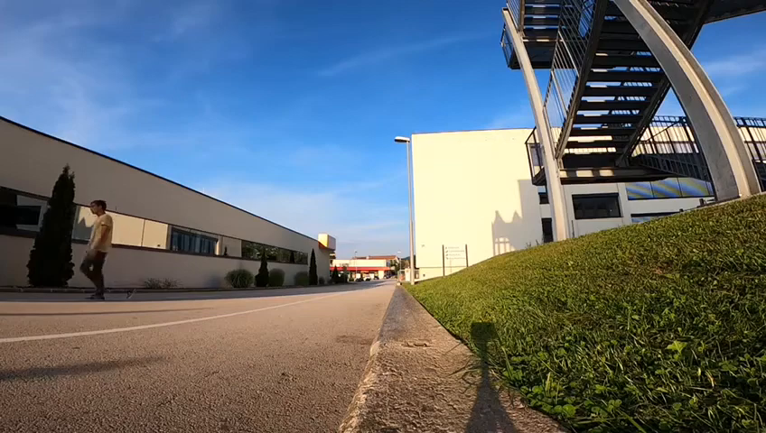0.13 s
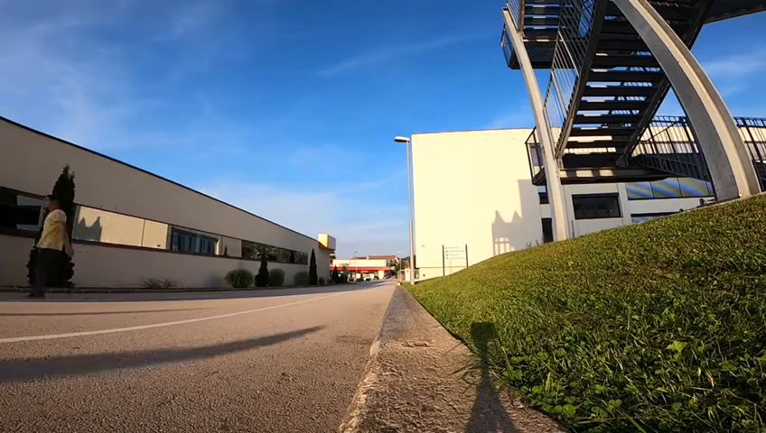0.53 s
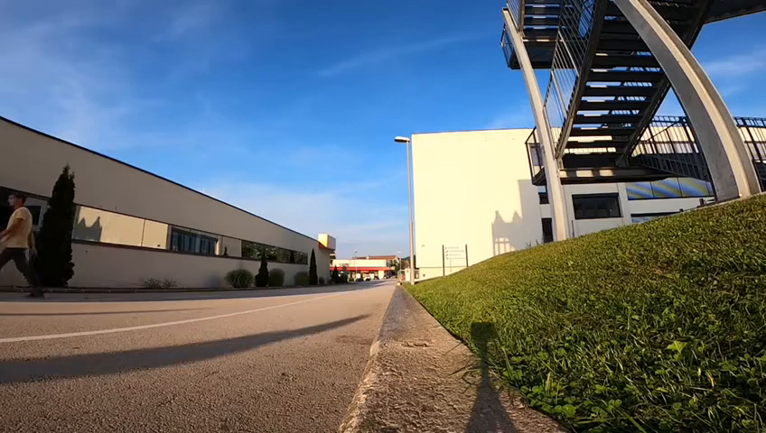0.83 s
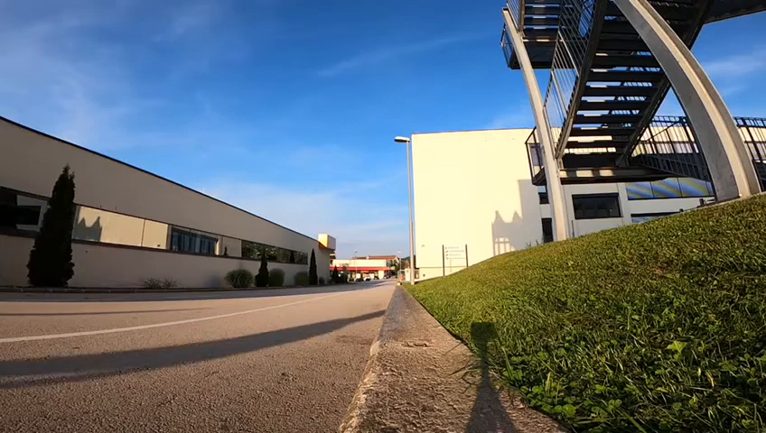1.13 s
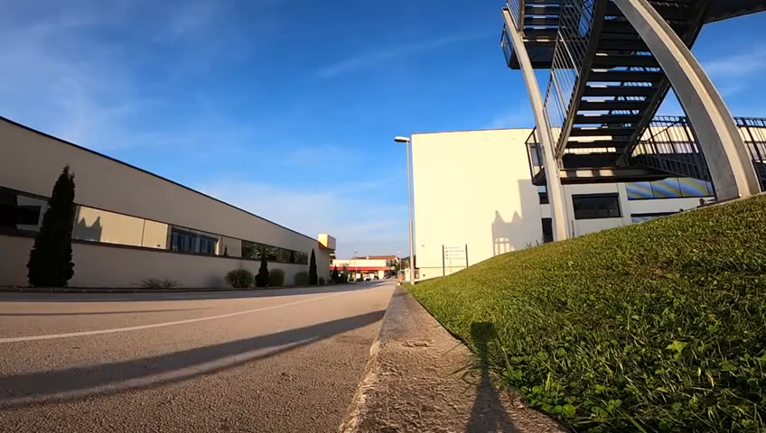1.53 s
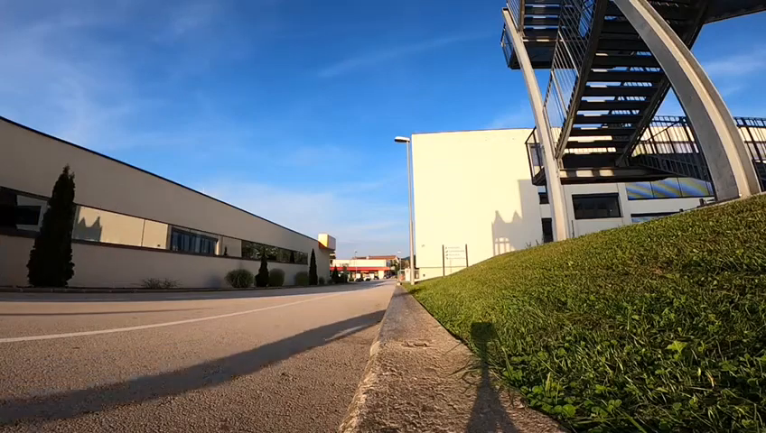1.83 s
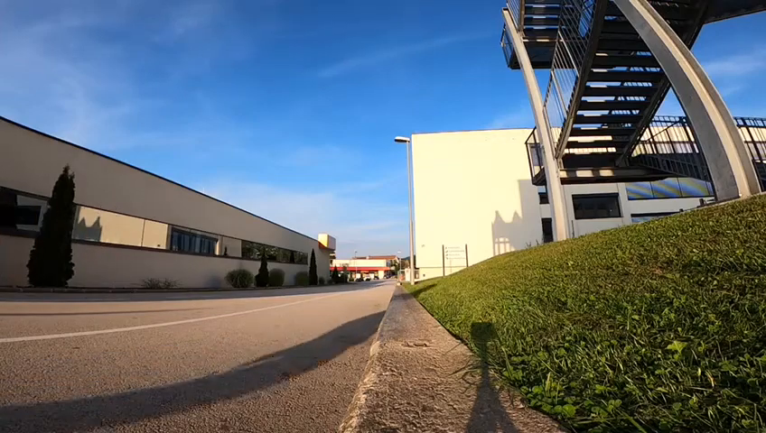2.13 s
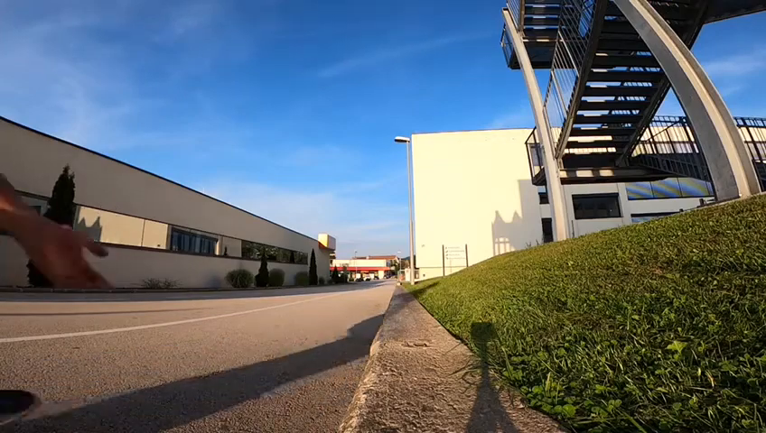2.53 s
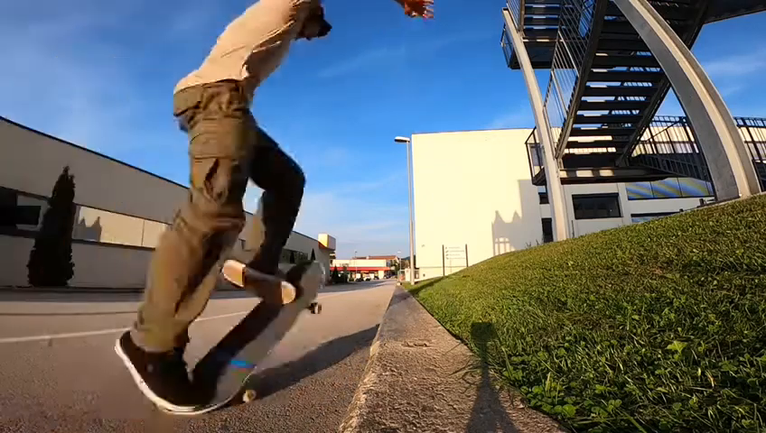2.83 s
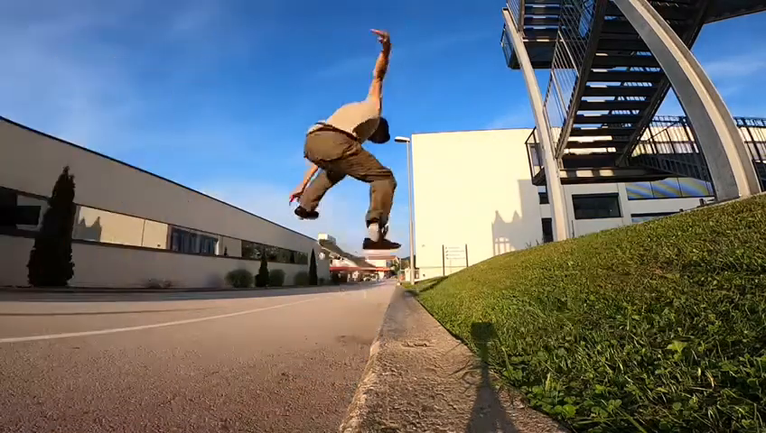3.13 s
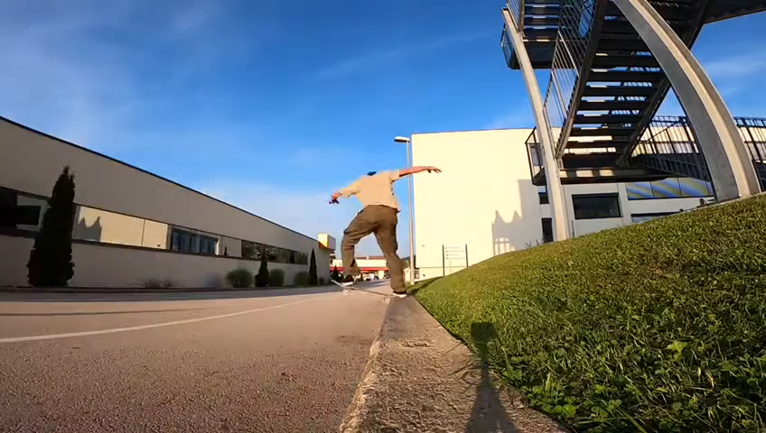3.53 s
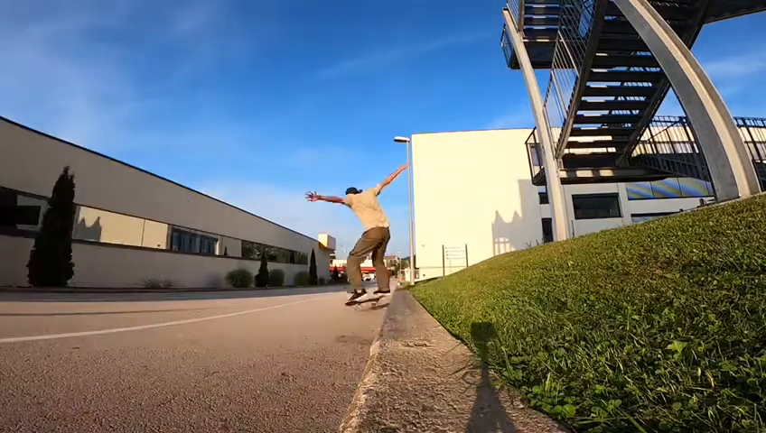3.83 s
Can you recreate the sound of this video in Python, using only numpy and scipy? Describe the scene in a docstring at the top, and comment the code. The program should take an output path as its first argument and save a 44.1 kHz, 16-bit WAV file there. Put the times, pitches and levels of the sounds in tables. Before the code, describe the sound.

Skateboard wheels rumble over coarse asphalt with small stone knocks, pass close to a low stereo microphone, then a pop, a short gap, clustered wooden clacks on a concrete ledge and a fading scrape, outdoors.

```python
"""Rough asphalt beside a concrete ledge, buildings around, a camera with two microphones on the ground.
A skateboard, made of dense random grains in coloured noise bands, rolls up from the left and passes close.
The tail pops, a shoe brushes up the grip tape, and the board clacks onto the ledge and scrapes along it:
the blows ring decaying modes, the rubs are filtered grains.
Noise-burst echoes return from the buildings over a sine-wave machine hum, noise air and light wind."""
import sys
import numpy as np
from scipy import signal
from scipy.fft import rfft, irfft
from scipy.io import wavfile
from scipy.ndimage import uniform_filter1d

SR = 44100
rng = np.random.default_rng(int(sys.argv[2]) if len(sys.argv) > 2 else 0)


def generate_wav(signal):
    """Clip the signal to [-1, 1] and save it as 16-bit WAV at the path in sys.argv[1]."""
    frames = np.transpose(np.atleast_2d(signal))
    scaled = np.clip(frames, -1, 1) * 32767
    pcm = np.round(scaled).astype(np.int16)
    wavfile.write(sys.argv[1], SR, pcm)


N = 176400  # samples, 4 s

# Machine hum in the distance. Each row: time in seconds, level in dB.
HUM_LEVEL = [(.12, -32), (.3, -24.5), (.72, -32), (.84, -43), (1.05, -30), (1.2, -43), (1.9, -31),
             (2.6, -33.5), (3.1, -48.5), (3.3, -37), (3.7, -43), (4, -41.5)]
# Pitch of the hum. Each row: time in seconds, frequency in Hz.
HUM_PITCH = [(0, 118.3), (.8, 119.5), (2, 117.3), (4, 111.8)]
HUM_WAVER_DB = 2
DRONE_HZ, DRONE_DB, DRONE_PEAK_S, DRONE_WIDTH_S = 60.1, -40.5, 1.4, 1
# Colour of the outdoor air. Each row: frequency in Hz, relative level in dB.
AIR_COLOUR = [(25, -1), (45, 20), (75, -4), (250, -20), (700, -9.5), (2000, -24), (5000, -20.5),
              (11000, -47)]
AIR_DB = -48.5
WIND_DB, WIND_TOP_HZ, GUST_DB = -70, 48.7, -6.5

# The rolling board. Each row: time in seconds, deck rumble in dB, wheel roar in dB, grit in dB.
ROLL_LEVELS = [(.12, -43, -41.5, -52), (.22, -30, -39.5, -42.5), (.42, -33.5, -44, -50.5),
               (.6, -32, -37.5, -44.5), (.8, -35.5, -38, -49), (1.1, -32, -33, -46), (1.42, -29, -31, -43),
               (1.75, -30, -33, -44.5), (2.12, -27, -32, -43), (2.2, -25.5, -28, -37),
               (2.34, -29, -33.5, -41), (2.48, -31, -28, -37.5), (2.7, -23, -33.5, -35),
               (2.82, -25.5, -26.5, -28), (2.92, -25.5, -27.5, -30.5), (2.955, -28, -32, -36.5),
               (3.0, -33, -26, -23), (3.04, -45.5, -54.5, -46.5)]
# Colour of the deck rumble. Each row: frequency in Hz, relative level per Hz in dB.
RUMBLE_COLOUR = [(25, -30), (55, -22), (80, -8.5), (105, 4.5), (140, 2), (220, 0.5), (310, 2), (400, -4),
                 (600, -7), (1500, -60)]
# Colour of the wheel roar. Each row: frequency in Hz, relative level per Hz in dB.
ROAR_COLOUR = [(200, -31), (380, -4.5), (480, 0.5), (580, -4), (670, 8), (770, -2), (1020, -3),
               (1250, -21.5), (2700, -50), (3350, -18.5), (4000, -48)]
# Colour of the grit under the wheels. Each row: frequency in Hz, relative level per Hz in dB.
GRIT_COLOUR = [(500, -4.5), (1300, 4.5), (1900, -0.5), (2900, -3.5), (3400, -3.5), (4000, -7.5),
               (5500, -10.5), (7200, -19), (10000, -24), (12000, -44.5)]
# Colour of the fine hiss heard up close. Each row: frequency in Hz, relative level per Hz in dB.
HISS_COLOUR = [(6500, -33), (10000, 20), (12500, -11), (16000, -78)]
GRAINS_PER_S, GRAIN_SPREAD_DB = 3500, 1.5
WHEEL_TURNS_HZ, WHEEL_THROB_DB, PATCHY_DB = 32.1, 1, 1.07
CLOSE_HISS_DB, CLOSE_S, CLOSE_WIDTH_S = -54, 2.87, 0.25
CHIPS_PER_S, CHIPS_DB = 100, -34  # coarse chips that crunch under the wheels up close

# Returns from the walls. Each row: delay in seconds, level in dB.
WALL_ECHOES = [(0.059, -20), (0.167, -25), (.225, -21), (0.272, -25)]
# Colour of what the buildings return. Each row: frequency in Hz, relative level in dB.
YARD_COLOUR = [(60, -28), (300, -27), (1000, -1), (2500, 0), (4300, 1.5), (8000, -2), (12000, -8)]
YARD_T60_S, YARD_TAIL_DB, ECHO_SMEAR_S = 1.2, -25, 0.022
YARD_WIDTH = 0.56  # gain of the echoes that differ between left and right

# Wheel bumping over a stone. Each row: start in seconds, level in dB before the modes' own levels.
STONES = [(.694, -32), (1.125, -25), (1.279, -28), (2.745, -20)]
# Modes a wheel rings with. Each row: frequency in Hz, level in dB, 60 dB decay time in seconds.
WHEEL_MODES = [(447, -14, 0.023), (668, 4, 0.035), (1006, -8, 0.025), (3500, -18, 0.017)]

# Scuffs of shoe, pebble and truck.
# Each row: peak time in seconds, level in dB, rise in seconds, fall in seconds, lowest frequency in Hz.
SCUFFS = [(1.859, -49, 0.0068, 0.025, 5860), (2.2, -43, 0.0049, 0.0093, 4000),
          (2.67, -34.5, 0.0018, 0.0036, 3000), (3.091, -34.5, 0.018, 0.0083, 5000),
          (3.557, -24, 0.002, 0.017, 500), (3.769, -38.5, 0.007, 0.045, 390)]
# Colour of the scuffs. Each row: frequency in Hz, relative level in dB.
SCUFF_COLOUR = [(300, -7), (1100, 18.5), (2000, 1), (4000, 3), (6000, -2), (8000, -12), (11000, -18.5)]

# Two deck booms as the board comes close.
# Each row: time in seconds, lower band in Hz, upper band in Hz, level of the lower band in dB.
BOOM = [(2.3, 129, 215, -31), (2.44, 142, 236, -23), (2.61, 211, 473, -23.5), (2.8, 183, 492, -21.5),
        (2.91, 278, 482, -22.5), (2.97, 260, 768, -32)]
# half-widths of the bands, and the upper band against the lower
BOOM_WIDTH_HZ, UPPER_WIDTH_HZ, UPPER_DB = 31.5, 68, -3.5

# Blows of the board. Each row: start in seconds, clack in dB, contact in seconds,
# upper limit of the clack in Hz, thump in dB, push in seconds.
BLOWS = [(2.972, -23, 0.00065, 950, -18.5, 0.00019), (2.984, -33.5, .002, 2420, -19, 0.00019),
         (2.994, -26, 0.00081, 1090, -15, 0.00032), (3.002, -18, 0.0052, 2800, -16.5, 0.00064),
         (3.334, -23, 0.0022, 1910, -28, 0.00072), (3.3364, -20.5, 0.0027, 2800, -20, 0.0017),
         (3.395, -13.5, 0.0035, 6300, -17.5, 0.00094), (3.414, -30, 0.00039, 5500, -16.5, 0.0005),
         (3.427, -18.5, 0.0041, 5300, -18.5, 0.00096), (3.461, -29, 0.00071, 6500, -26, 0.0014),
         (3.473, -28, .0005, 5960, -23, 0.0018)]
# Modes the board rings with. Each row: frequency in Hz, level in dB, 60 dB decay time in seconds.
BOARD_MODES = [(757, -4, 0.082), (1404, 7.5, 0.02), (1804, 9, 0.026), (2286, 4, 0.032), (2624, 3.5, 0.045),
               (2930, 9, 0.015), (3460, 9.5, 0.013), (4040, 13, .011), (4650, 5.5, 0.013),
               (5600, -2, 0.011)]
# Low bending modes of the deck. Each row: frequency in Hz, level in dB, 60 dB decay time in seconds.
DECK_MODES = [(55.5, -17, 0.2), (137.5, -3.5, 0.051), (216, -3.5, 0.076), (273, 2.5, 0.046),
              (399, -1.5, 0.026), (482, 3, 0.03), (600, -3.5, 0.024), (1000, 3, 0.018)]
# Colour of the bare contact. Each row: frequency in Hz, relative level in dB.
CRACK_COLOUR = [(200, -2.5), (600, -3), (1050, -8), (1500, 0.5), (2100, 4), (3300, 0.5), (4200, 3.5),
                (5200, -9.5), (6500, -4), (8000, -26), (11500, -29)]
CRACK_DB, RELEASE_S = -1, 0.0011  # bare contact against the ring; fading of the force after contact
WEIGHT_LAG = 1.48  # the rider's weight bends the deck this many contact lengths after the clack
FIRST_TOUCH = 0.44  # size of the first sharp contact against the chatter after it

# Sliding on the ledge. Each row: time in seconds, deck rumble in dB, scrape in dB.
SLIDE_LEVELS = [(3.1, -65, -79), (3.28, -85, -50), (3.35, -45, -30.5), (3.39, -32, -38.5), (3.44, -30, -27),
                (3.5, -30.5, -38), (3.545, -38.5, -38), (3.57, -31.5, -37), (3.68, -66, -42),
                (3.82, -60, -72), (4, -126, -69)]
# Colour of the scrape. Each row: frequency in Hz, relative level in dB.
SCRAPE_COLOUR = [(200, -11), (450, 4), (900, 3.5), (1350, 2.5), (2400, -2), (4000, -10), (6000, -13.5),
                 (8000, -37), (11000, -32)]
SHUDDER_DB = 1

# How far to the left the board is. Each row: time in seconds, share from 0 to 1.
BEARING = [(.2, 0.7), (1.8, 0.87), (2.55, 0.86), (2.75, 0.52), (2.92, 0.16), (3.1, 0.15), (3.4, 0.1),
           (4, 0.24)]
# Shading of the far microphone by the camera body. Each row: frequency in Hz, side over mid in dB.
BODY_SHADE = [(60, -16), (190, -23), (350, -10.5), (620, -3.5), (1100, -0.5), (3500, 1.5), (6500, -8),
              (10000, 3.5)]
# Ground scatter that differs between the microphones. Each row: frequency in Hz, level in dB.
GROUND_SCATTER = [(100, -42), (700, -11.5), (2000, -7), (4500, -7.5), (7000, 9), (11000, -4)]
LEFT_RIGHT = np.array([[1], [-1]])  # a side signal is opposite at the two microphones
OPEN_S, FADE_S, CEILING, TOP_HZ = 0.12, 0.045, .95, 11500


def undb(db):
    """Decibels to gain."""
    return 10 ** (np.asarray(db) / 20)


def unit(x):
    """Scale to rms 1."""
    return x / np.sqrt(np.mean(x ** 2))


def times():
    """Seconds at each sample."""
    return np.arange(N) / SR


def curve(table, axis=1):
    """One column of a table, joined by straight lines in time."""
    rows = np.array(table)
    return np.interp(times(), rows[:, 0], rows[:, axis])


def gains(points):
    """Gain at each frequency bin from (Hz, dB) points, joined on a log frequency scale."""
    hz, db = np.array(points).T
    bins_hz = np.arange(N // 2 + 1) * SR / N
    return undb(np.interp(np.log(bins_hz + 1), np.log(hz), db))


def convolve(x, response):
    """Play a sound through a response."""
    return signal.fftconvolve(x, response)[:len(x)]


def colour(x, points):
    """Causal minimum-phase filter with the given spectrum, built by folding its cepstrum."""
    cepstrum = irfft(np.log(gains(points)), N)[:N // 2]
    cepstrum[1:] *= 2
    response = irfft(np.exp(rfft(cepstrum, N)), N)[:N // 20]
    return convolve(x, response)


def cut(x, hz, kind, order=2):
    """Low-pass or high-pass."""
    sos = signal.butter(order, min(hz, SR / 2 - 1), kind, fs=SR, output="sos")
    return signal.sosfilt(sos, x)


def walk(rate):
    """Smooth random drift with a spread near 1, taking a new value `rate` times a second."""
    k = int(SR / rate)
    steps = np.repeat(rng.standard_normal(N // k + 1), k)
    smooth = uniform_filter1d(uniform_filter1d(steps, k), k)
    return unit(smooth)[:N]


def grains():
    """Dense tiny impacts on stone chips, a few harder than the rest."""
    hits = rng.random(N) < GRAINS_PER_S / SR
    signs = rng.choice([-1, 1], N)
    hardness = undb(GRAIN_SPREAD_DB * np.minimum(rng.exponential(size=N), 5))
    return hits * signs * hardness


def ring(modes, t, jitter=.012):
    """Decaying modes, a little different in pitch and sign at each point of contact."""
    total = 0
    for hz, db, t60 in modes:
        sign = rng.choice([-1, 1])
        pitch = hz * (1 + jitter * rng.standard_normal())
        total = total + sign * undb(db - 60 * t / t60) * np.sin(2 * np.pi * pitch * t)
    return total


def background():
    """A wavering machine hum, a lower drone that swells once, and nearly centred outdoor air."""
    def tone(hz):
        wavering = hz * (1 + 0.01 * walk(7.6))
        return np.sqrt(2) * np.sin(2 * np.pi * np.cumsum(wavering) / SR)
    hum = tone(curve(HUM_PITCH)) * undb(curve(HUM_LEVEL) + HUM_WAVER_DB * walk(12))
    swell = 1 / (1 + ((times() - DRONE_PEAK_S) / DRONE_WIDTH_S) ** 2)
    drone = tone(DRONE_HZ) * undb(DRONE_DB) * swell
    mid = unit(colour(rng.standard_normal(N), AIR_COLOUR))
    side = unit(colour(rng.standard_normal(N), AIR_COLOUR))
    return hum + drone + undb(AIR_DB) * (mid + 0.067 * side * LEFT_RIGHT)


def wind():
    """Light gusts buffet the microphones as very low noise, partly unlike left and right."""
    def buffet():
        low = cut(rng.standard_normal(N), WIND_TOP_HZ, "low", order=4)
        return unit(cut(low, 32, "high"))
    gusts = undb(WIND_DB + GUST_DB * walk(7.7))
    return gusts * (buffet() + buffet() * LEFT_RIGHT)


def rolling():
    """Chips shake deck and wheels, throbbing with each wheel turn; hiss and crunch rise up close."""
    turn = 2 * np.pi * np.cumsum(WHEEL_TURNS_HZ * (1 + 0.034 * walk(5.38))) / SR
    throb_db = WHEEL_THROB_DB * (np.sin(turn) + np.sin(2 * turn))
    load = undb(throb_db + PATCHY_DB * walk(22.0))

    def layer(points):
        return unit(colour(grains() * load, points))

    on_ground = times() < ROLL_LEVELS[-2][0]
    close = on_ground / (1 + ((times() - CLOSE_S) / CLOSE_WIDTH_S) ** 2)
    hiss = undb(CLOSE_HISS_DB) * layer(HISS_COLOUR)
    chips = cut(1. * (rng.random(N) < CHIPS_PER_S / SR), CHIPS_PER_S, "low")
    crunch = undb(CHIPS_DB) * unit(colour(grains() * chips, GRIT_COLOUR))
    rumble = layer(RUMBLE_COLOUR) * undb(curve(ROLL_LEVELS, axis=1))
    roar = layer(ROAR_COLOUR) * undb(curve(ROLL_LEVELS, axis=2))
    grit = layer(GRIT_COLOUR) * undb(curve(ROLL_LEVELS, axis=3))
    return close * (hiss + crunch) + rumble + roar + grit


def yard(x):
    """Buildings return smeared echoes and a thin tail, as enveloped bursts of noise."""
    t = times()

    def burst(envelope):
        return unit(rng.standard_normal(N) * envelope) / np.sqrt(N)  # total energy 1

    tail = undb(-60 * t / YARD_T60_S) * (1 - np.exp(-t / 0.019))
    response = undb(YARD_TAIL_DB) * burst(tail)
    for delay, db in WALL_ECHOES:
        smear = (t > delay) * np.exp(-abs(t - delay) / ECHO_SMEAR_S)
        response = response + undb(db) * burst(smear)
    return convolve(colour(x, YARD_COLOUR), response)


def stones():
    """Single stones knock the wheels into a short hollow ring of decaying modes."""
    out, t = np.zeros(2 * N), times()[:N // 20]
    for start, db in STONES:
        i = int(start * SR)
        out[i:i + len(t)] += undb(db) * ring(WHEEL_MODES, t)
    return out[:N]


def scuffs():
    """Short gritty rubs, high-passed grains that swell and die exponentially."""
    t, rub = times(), colour(grains(), SCUFF_COLOUR)
    out = np.zeros(N)
    for peak, db, rise, fall, lowest_hz in SCUFFS:
        swell = np.exp(-np.maximum((peak - t) / rise, (t - peak) / fall))
        out += unit(cut(rub, lowest_hz, "high")) * undb(db) * swell
    return out


def boom():
    """Two narrow bands of rumble whose pitches climb overall as the board comes close."""
    def band(hz, width_hz):
        # shift the band down to zero, low-pass it, shift it back
        spin = np.exp(2j * np.pi * np.cumsum(hz) / SR)
        return unit(np.real(cut(grains() / spin, width_hz, "low") * spin))
    near = (times() > BOOM[0][0]) & (times() < BOOM[-1][0])
    lower = band(curve(BOOM, axis=1), BOOM_WIDTH_HZ)
    upper = undb(UPPER_DB) * band(curve(BOOM, axis=2), UPPER_WIDTH_HZ)
    return near * undb(curve(BOOM, axis=3)) * (lower + upper)


def chatter(envelope, count=4):
    """A sharp first contact, then a short random force that excites all pitches nearly evenly."""
    force = rng.standard_normal(len(envelope)) * envelope
    for _ in range(count):
        flat = irfft(np.exp(1j * np.angle(rfft(force))), len(envelope))  # keep only the phases
        force = flat * np.sqrt(envelope)
    first = np.arange(len(envelope)) == 0
    return force / np.linalg.norm(force) + FIRST_TOUCH * first


def blows():
    """Each blow chatters for a few milliseconds into the board's modes, then bends the deck."""
    out, t = np.zeros(2 * N), times()[:N // 20]

    def sized(x, db):
        return unit(x) * undb(db) / np.sqrt(20)  # the level is that of the same energy in 10 ms

    for start, clack_db, contact, bright_hz, thump_db, push in BLOWS:
        touch = chatter(np.exp(-np.maximum(t - contact, 0) / RELEASE_S))
        crack = undb(CRACK_DB) * unit(colour(touch, CRACK_COLOUR))
        clack = unit(convolve(touch, ring(BOARD_MODES, t))) + crack
        late = np.maximum(t - WEIGHT_LAG * contact, 0)
        weight = late * np.exp(-2 * late / push)
        thump = convolve(weight, ring(DECK_MODES, t))
        i = int(start * SR)
        out[i:i + len(t)] += sized(cut(clack, bright_hz, "low", order=4), clack_db)
        out[i:i + len(t)] += sized(thump, thump_db)
    return out[:N]


def slide():
    """The board scrapes along the ledge, catching unevenly, over a grainy rumble of its deck."""
    catch = undb(SHUDDER_DB * walk(90))
    rumble = unit(colour(grains(), RUMBLE_COLOUR)) * undb(curve(SLIDE_LEVELS, axis=1))
    scrape = unit(colour(grains() * catch, SCRAPE_COLOUR)) * undb(curve(SLIDE_LEVELS, axis=2))
    return rumble + scrape


def scene():
    """Far left, the board is louder at the left microphone, its treble diffuse; close, it is centred."""
    board = rolling() + stones() + scuffs() + boom() + blows() + slide()
    scatter_burst = unit(rng.standard_normal(N // 400)) / np.sqrt(N // 400)  # 10 ms, energy 1
    scatter = convolve(colour(board, GROUND_SCATTER), scatter_burst)
    shaded = irfft(rfft(board) * gains(BODY_SHADE), N)
    side = (shaded + scatter) * curve(BEARING)
    mid = board + yard(board)
    return mid + LEFT_RIGHT * (side + YARD_WIDTH * yard(board)) + background() + wind()


def record(dry):
    """The sound fades in quickly, the hardest peaks are rounded and the top is cut."""
    fade = np.clip((times() - OPEN_S) / FADE_S, 0, 1)
    rounded = dry / (1 + (dry / CEILING) ** 4) ** .25
    top_cut = signal.ellip(8, .2, 80, TOP_HZ, fs=SR, output="sos")
    return signal.sosfilt(top_cut, rounded * fade)


dry = scene()
out = record(dry)
generate_wav(out)
```